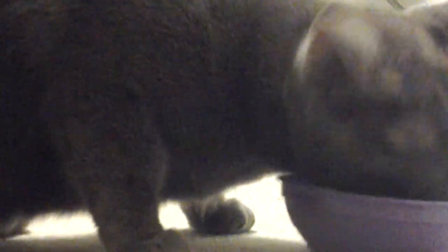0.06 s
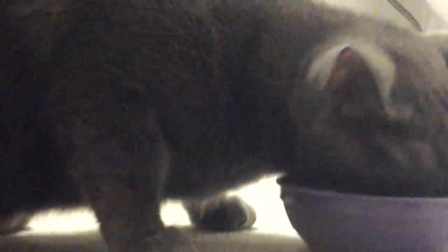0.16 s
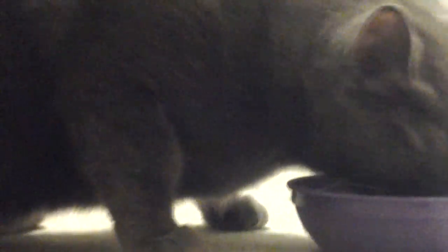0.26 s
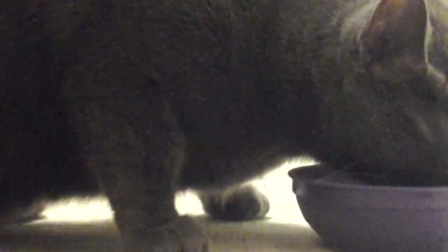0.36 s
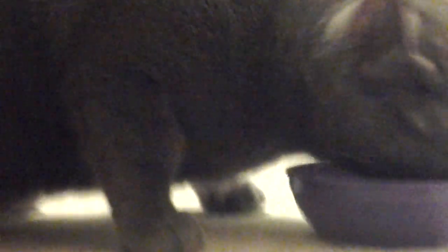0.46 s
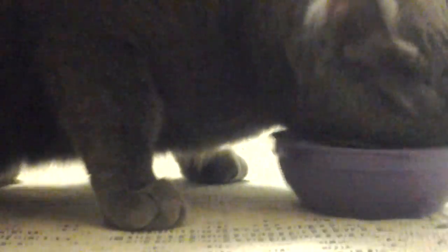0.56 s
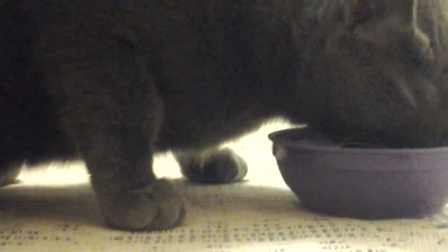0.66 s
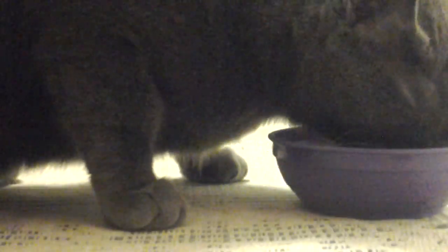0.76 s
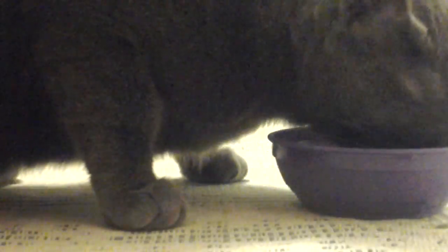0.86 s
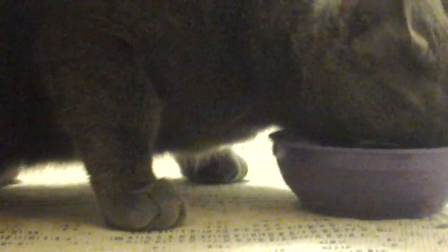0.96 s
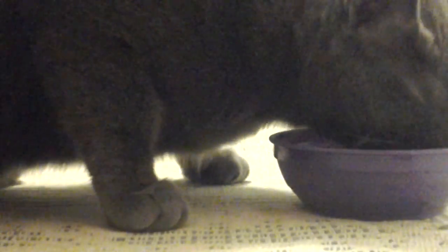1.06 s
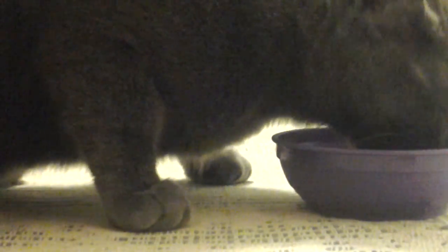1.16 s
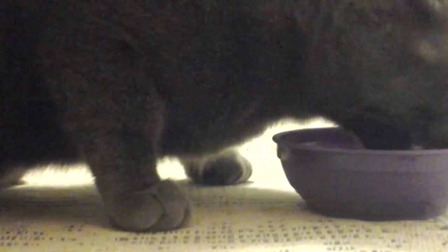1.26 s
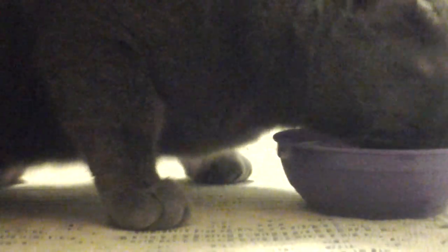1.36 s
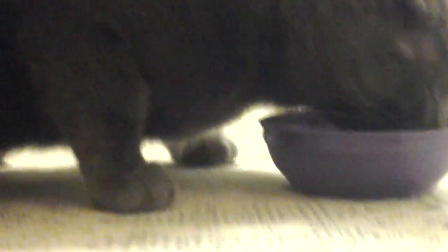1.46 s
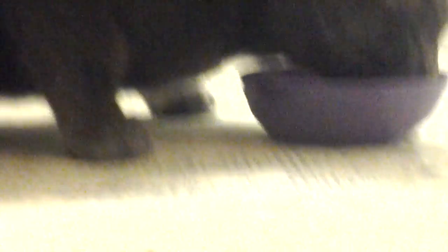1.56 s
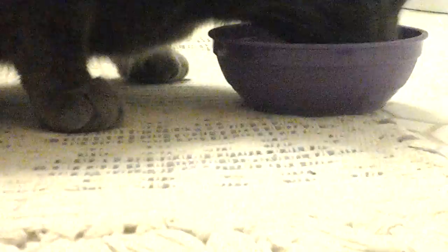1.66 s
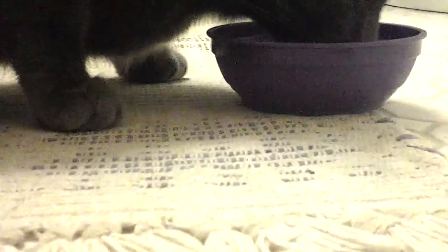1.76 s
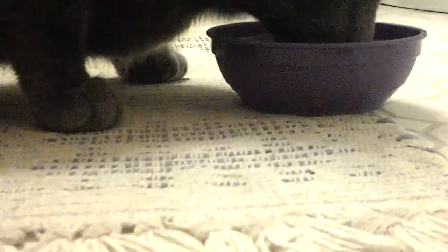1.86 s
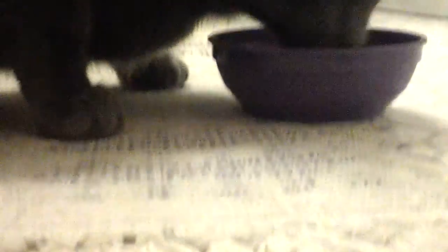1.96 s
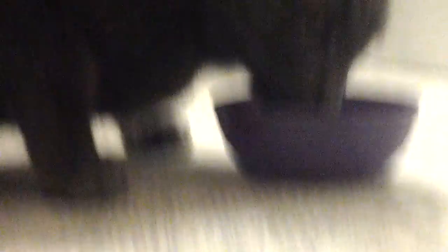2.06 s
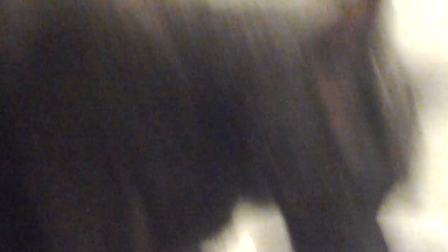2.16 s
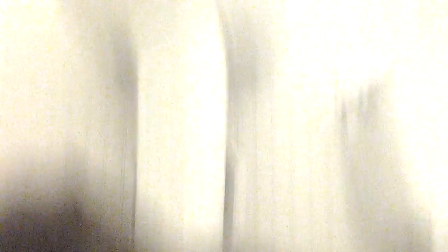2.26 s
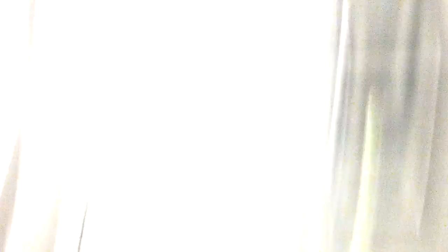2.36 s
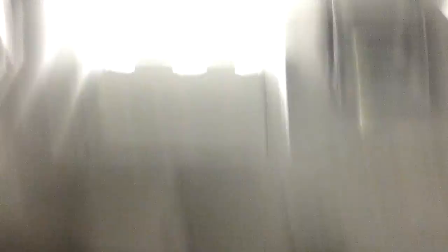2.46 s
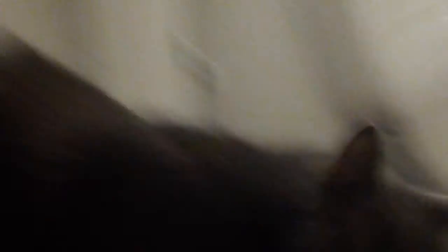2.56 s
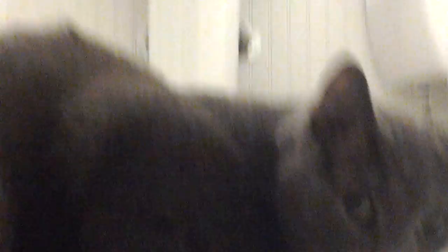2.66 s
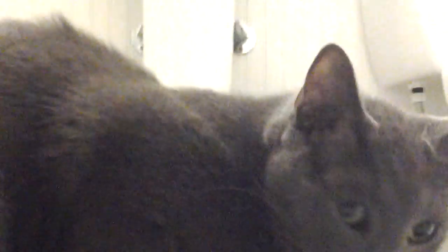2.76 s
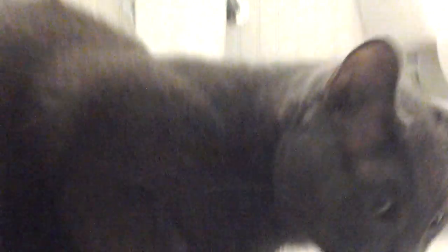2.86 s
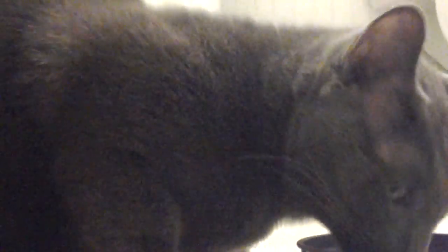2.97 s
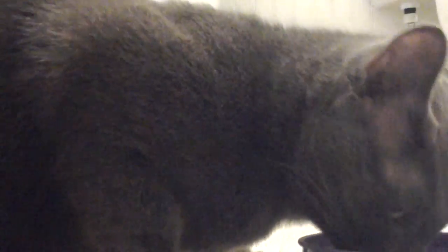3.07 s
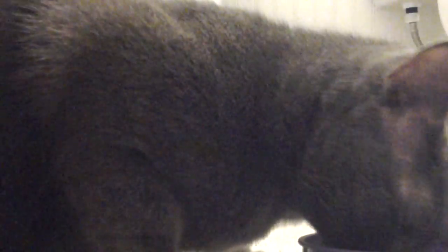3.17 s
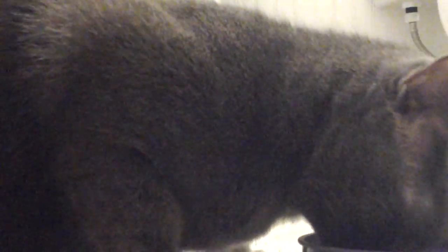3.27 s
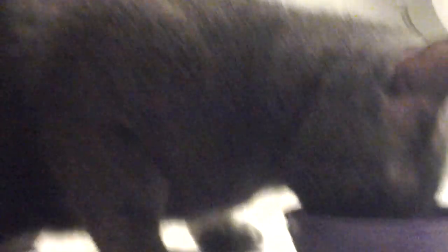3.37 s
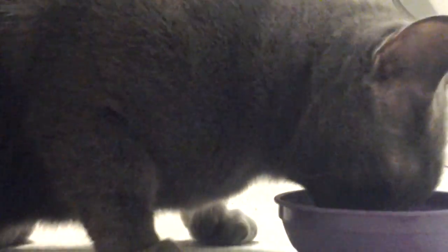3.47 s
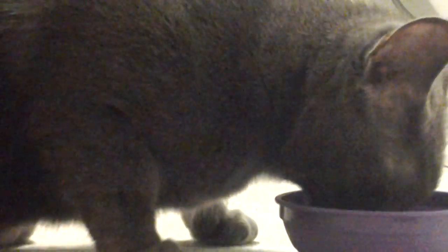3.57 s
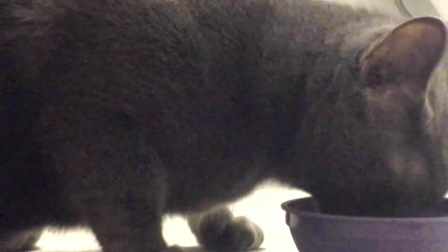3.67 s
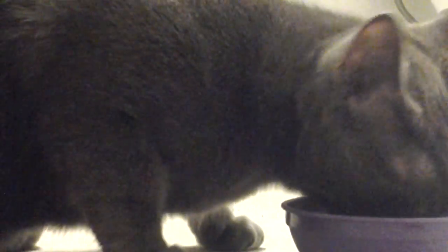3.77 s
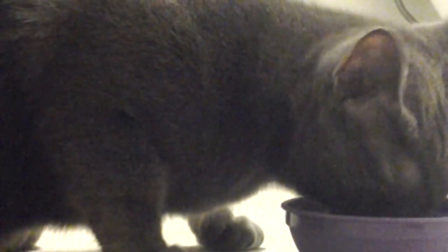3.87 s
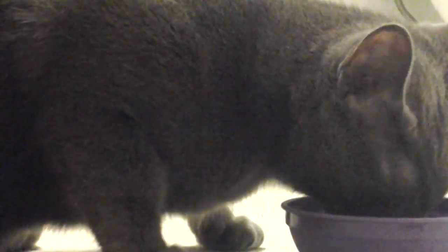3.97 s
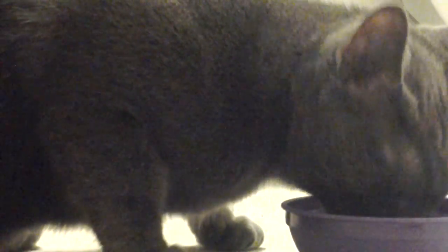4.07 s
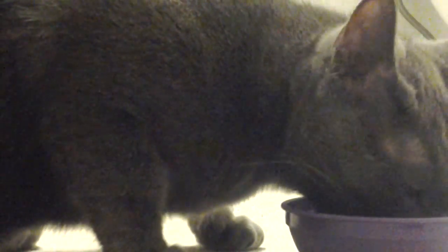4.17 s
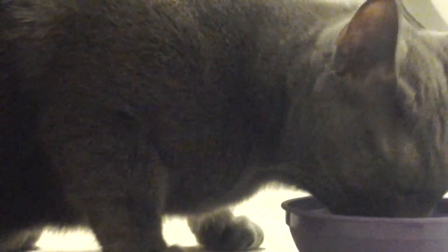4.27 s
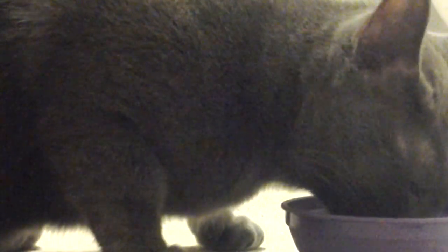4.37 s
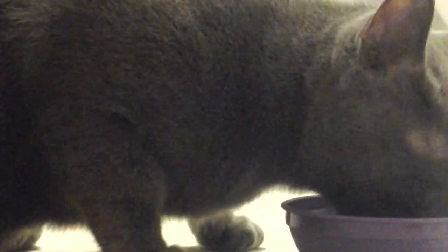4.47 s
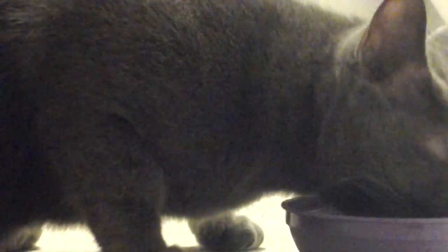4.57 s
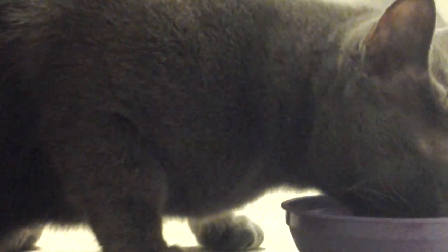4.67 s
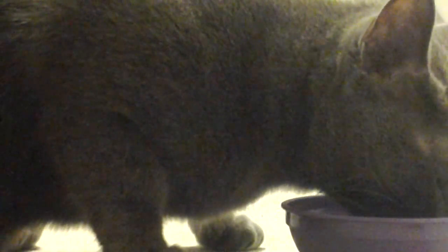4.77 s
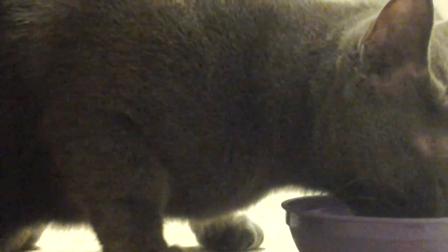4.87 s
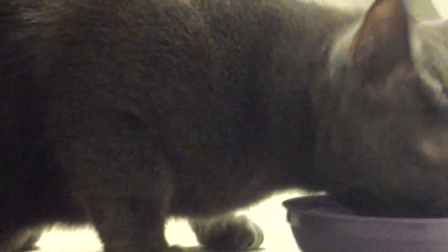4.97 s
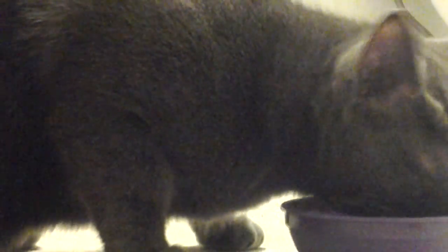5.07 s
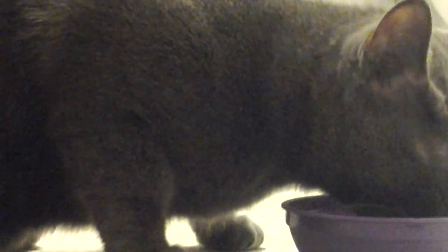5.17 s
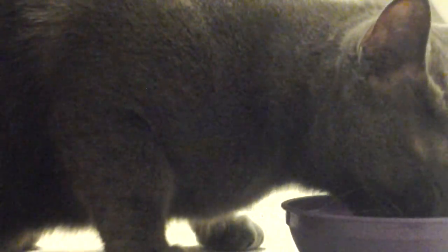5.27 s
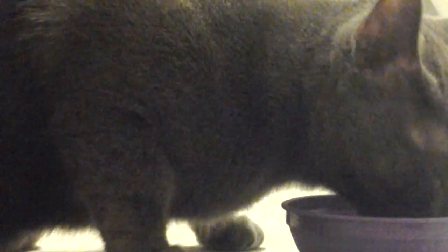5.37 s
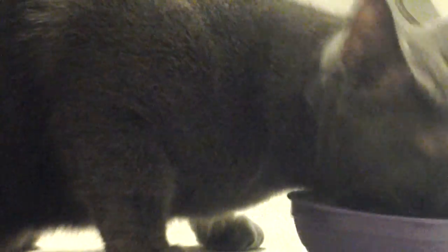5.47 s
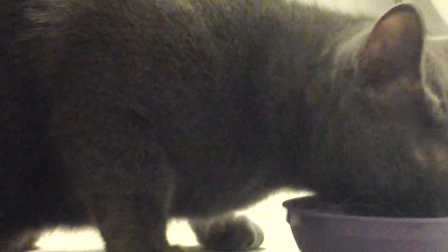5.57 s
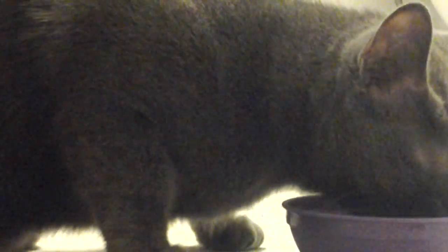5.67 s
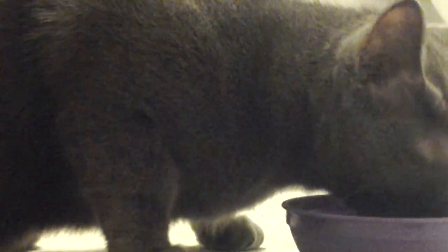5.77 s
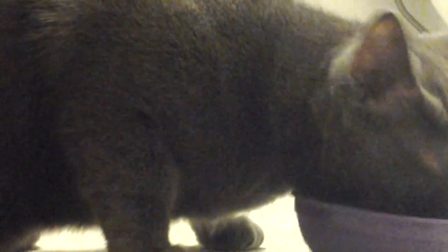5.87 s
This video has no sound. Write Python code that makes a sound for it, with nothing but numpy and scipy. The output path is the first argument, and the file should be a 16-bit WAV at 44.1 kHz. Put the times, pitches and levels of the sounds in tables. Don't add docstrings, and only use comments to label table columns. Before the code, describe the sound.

A cat eats dry food from a plastic bowl, very close to a small hand-held microphone in a small room with faint steady hiss and little bass. From 0 to 0.9 s, irregular kibble snaps and crumbling mix with sharp ticks and dull thuds of fingers on the case, strongest near 0.3 s. From 1 to 1.6 s rubbing, taps and heavier thumps dominate, the hardest at 1.2 s. Faint crunches return around 1.9 s. From 2.3 to 2.7 s the camera swings and strikes the floor: rattling clicks and loud, hollow, clipped bangs, worst around 2.5 s. A quieter gap follows, then a bright latch clack at 3.0 s and light handling. From 3.6 s deeper mouthfuls crack and ring the bowl, densest until 4.5 s, with loose kibble pinging. A soft nose puff swells around 5.2 s; sparse crunches and small bumps continue to the end, near 6 s.

```python
import sys
import numpy as np
from scipy import signal
from scipy.io import wavfile
from scipy.ndimage import uniform_filter1d

SR = 44100
rng = np.random.default_rng(int(sys.argv[2]) if len(sys.argv) > 2 else 0)


def boost(x):
    u = np.asarray(x, float) / 20
    return 10 ** u


def log_audio(samples):
    frames = np.atleast_2d(samples).T
    limited = np.clip(frames, -1, 1)
    pcm = np.round(limited * 32767).astype(np.int16)
    wavfile.write(sys.argv[1], SR, pcm)


N = 260631


def evened(x):
    return x / np.sqrt(np.mean(x ** 2) + 1e-20)


def peaked(x):
    return x / (np.abs(x).max() + 1e-12)


def add(mix, start_s, sound):
    part = mix[max(round(start_s * SR), 0):][:len(sound)]
    part += sound[:len(part)]


def read(points, hz):
    point_hz, value = np.transpose(points)
    return np.interp(np.log(hz + 1), np.log(point_hz + 1), value)


def colour(x, points):
    hz = np.abs(np.fft.fftfreq(4096, 1 / SR))
    octaves_below = np.maximum(np.log2(points[0][0] / (hz + 1)), 0)
    octaves_above = np.maximum(np.log2((hz + 1) / points[-1][0]), 0)
    gain_db = read(points, hz) - 30 * (octaves_below + octaves_above)
    log_gain = np.log(boost(np.maximum(gain_db, -90)))
    taps = np.fft.ifft(np.exp(np.conj(signal.hilbert(log_gain)))).real[:2048]
    return evened(signal.oaconvolve(x, taps)[:len(x)])


def resonate(x, hz, width_hz):
    turn = np.exp(2j * np.pi * hz * np.arange(len(x)) / SR)
    r = np.exp(-np.pi * width_hz / SR)
    return 2 * (turn * signal.lfilter([1 - r], [1, -r], x / turn)).real


def steep(x, hz, width_hz):
    for _ in range(3):
        x = resonate(x, hz, width_hz)
    return peaked(x)


def grains(per_s, spread_db, length_s, bed):
    size = boost(spread_db * np.minimum(rng.exponential(1, N), 3))
    size = size * (rng.random(N) < per_s / SR)
    puff = np.exp(-np.arange(1500) / (length_s * SR))
    gate = bed + evened(signal.oaconvolve(size, puff)[:N])
    return rng.standard_normal(N) * gate


def thuds(rows, sag, roughness):
    out, t = np.zeros(N), np.arange(3000) / SR
    noise = rng.standard_normal((len(rows), len(t)))
    for (start_s, db, hz, t60_s), n in zip(rows, noise):
        turns = hz * (sag * t + (1 - sag) * 0.005 * (1 - np.exp(-t / 0.0029)))
        rattle = evened(steep(n, 1.2 * hz, 1.3 * hz))
        push = np.sin(2 * np.pi * turns) + 0.17 * np.sin(np.pi * turns) + roughness * rattle
        knock = push * boost(-60 * t / t60_s) * (1 - np.exp(-t / 0.0003))
        add(out, start_s, boost(db) * peaked(knock))
    return out


# (frequency [Hz], width [Hz], level [dB])
SHELL_MODES = [(1720, 502, 8.5), (2340, 760, 8)]


def breaks(rows, burst_s, spread):
    out, t = np.zeros(N), np.arange(600) / SR
    noise = rng.standard_normal((len(rows), len(t)))
    for (start_s, crack_db, crack_hz, shell_db, *port_db), n in zip(rows, noise):
        snap = n + 1.5 * np.sign(n) * (t < .0002)
        burst = snap * np.minimum(t / .0001, 1) * np.exp(-t / burst_s)
        crack = steep(burst, crack_hz, spread * crack_hz)
        shell = peaked(sum(boost(db) * steep(burst, hz, 2 * width) for hz, width, db in SHELL_MODES))
        port = sum(boost(db) * steep(burst, 12920, 8600) for db in port_db)
        add(out, start_s, boost(crack_db) * crack + boost(shell_db) * shell + port)
    return out


def pitched(rows, even_hz):
    hz_per_db = 31.5
    return [(start_s, crack_db, even_hz + hz_per_db * np.clip(crack_db - ring_db, -25, 25), ring_db)
            for start_s, crack_db, ring_db in rows]


# (frequency [Hz], density [dB per Hz])
HISS = [(15, -35), (25, -11.5), (49, -10), (247, -1.5), (913, -6), (1440, -7.5), (2720, -12), (4060, -14),
        (6740, -19.5), (14600, -17)]


def hiss(signal_in):
    busy_db = 10 * np.log10(abs(uniform_filter1d(signal_in ** 2, 5000)) + 1e-12)
    sink_db = np.clip(0.39 * (busy_db + 51), -3, 0)
    return boost(-55 + sink_db) * colour(rng.standard_normal(N), HISS)


# (frequency [Hz], t60 [s])
ROOM = [(1300, 0.17), (9000, 0.15)]


def room(x):
    taps = np.zeros(SR // 2)
    at = np.arange(120, SR // 2 - 20, 20)
    taps[at + rng.integers(0, 20, len(at))] = rng.choice([-1., 1.], len(at))
    hz, t, z = signal.stft(taps, SR, nperseg=256)
    decay = boost(-60 * t / read(ROOM, hz)[:, None])
    tail = signal.istft(z * decay, SR, nperseg=256)[1]
    return signal.oaconvolve(x, tail / np.linalg.norm(tail))[:N]


# (start [s], end [s], frequency [Hz], width [Hz], rms level [dB])
HUM = [(1.53, 1.67, 450, 170, -44), (2.15, 2.32, 410, 220, -48), (2.66, 2.76, 420, 110, -40),
       (2.74, 2.85, 400, 100, -47), (2.492, 2.537, 450, 160, -21), (2.565, 2.65, 400, 170, -29),
       (3.07, 3.14, 280, 150, -52), (4.68, 4.94, 540, 110, -62), (5.57, 5.83, 595, 140, -56),
       (3.5, 3.58, 1380, 200, -57), (3.04, 3.4, 2350, 200, -64), (4.012, 4.042, 480, 200, -47)]


def hum():
    out, noise = np.zeros(N), rng.standard_normal((len(HUM), SR // 2))
    for (start_s, end_s, hz, width_hz, db), n in zip(HUM, noise):
        settled = steep(n, hz, width_hz)[4000:]
        tone = evened(settled[:round((end_s - start_s) * SR)])
        add(out, start_s, boost(db) * tone * signal.windows.tukey(len(tone), .25))
    return out


# (firmest contact [s], rubbing level [dB], skin fizz level [dB], reach before [s], reach after [s])
STROKES = [(0.171, -50, -57, 0.21, 0.16), (.44, -45.5, -50, 0.46, 0.49), (.55, -40, -47, .13, 0.13),
           (0.987, -32, -65, 0.019, .04), (1.034, -36, -54, 0.12, 0.15), (1.13, -30, -50, 0.09, 0.21),
           (1.207, -23, -44.5, 0.069, 0.081), (1.245, -30.5, -45.5, 0.054, 0.087),
           (1.49, -39.5, -46.5, 0.19, .18), (1.598, -38.5, -40.5, 0.28, 0.18), (1.78, -48, -63, .06, 0.043),
           (2.07, -50, -63, 0.1, 0.069), (2.18, -47, -46, 0.3, 0.18), (2.29, -38.5, -38, 0.22, 0.46),
           (2.41, -31.5, -37, 0.021, 0.15), (2.5, -18, -41.5, 0.019, .05), (2.53, -30, -45.5, 0.036, .05),
           (2.62, -28.5, -32, .2, 0.037), (2.69, -28.5, -42.5, 0.047, 0.2),
           (3.158, -51.5, -56.5, 0.27, 0.31), (3.43, -47.5, -45, 0.14, 0.11),
           (4.201, -62, -53.5, .92, 0.85), (5.829, -44, -69, 0.049, 0.19), (5.2, -56.5, -74.5, 0.49, 0.62)]


def action(level_column):
    rise_db, fall_db = 29.5, 24
    rows, t = np.transpose(STROKES), np.arange(0, N + 64, 64) / SR
    away_s = t[:, None] - rows[0]
    slope_db = np.where(away_s < 0, rise_db * away_s / rows[3], -fall_db * away_s / rows[4])
    level_db = (rows[level_column] + slope_db).max(axis=1)
    return boost(np.interp(np.arange(N) / SR, t, level_db))


# (frequency [Hz], density [dB per Hz])
CASE = [(29, -89), (50, -7), (300, 0.5), (462, 3), (530, 3.5), (900, 2), (2000, -14.5), (2600, -56),
        (4400, -120)]
# (frequency [Hz], density [dB per Hz])
FIZZ = [(3530, -3.5), (6000, -8), (7570, -6), (12000, -12.5), (14500, -8.5)]


def handling():
    slips = grains(130, 2.7, 0.0039, 2.5)
    rub = evened(colour(slips, CASE) + .6 * evened(steep(slips, 360, 400)))
    fizz = colour(grains(460, 1.5, .001, 1.4), FIZZ)
    return action(1) * rub + boost(-8.0) * action(2) * fizz


# (time [s], peak level [dB], pitch [Hz], t60 [s])
GRIP_THUDS = [(0.3016, -29, 659, 0.1), (0.3133, -16, 446, 0.016), (0.35, -24.5, 387, 0.015),
              (0.3925, -13, 642, 0.018), (0.5276, -23.5, 356, 0.033), (0.543, -21.5, 445, 0.023),
              (0.98, -22, 480, 0.0023), (0.9842, -21.5, 397, 0.021), (1.11, -24.5, 494, 0.026),
              (1.126, -16.5, 510, 0.012), (1.1741, -21, 450, 0.053), (1.201, -3, 360, 0.012),
              (1.2126, -10, 450, 0.0084), (1.2205, -21, 600, 0.066), (1.243, -15, 463, 0.012),
              (1.4719, -16.5, 440, 0.0055), (1.4875, -17, 544, 0.0066), (1.5155, -23.5, 510, 0.055),
              (1.6006, -26, 445, 0.019), (2.064, -34, 692, 0.012), (3.136, -29.5, 335, 0.042),
              (3.143, -29.5, 246, 0.045), (3.242, -34.5, 893, 0.06), (3.4053, -33.5, 283, 0.032),
              (3.4195, -25.5, 332, 0.045), (3.4312, -31, 289, 0.11), (5.585, -35, 664, 0.025),
              (5.817, -30.5, 640, 0.032), (5.8304, -31, 666, 0.021)]
# (time [s], peak level [dB], pitch [Hz], t60 [s])
FLOOR_BUMPS = [(2.2717, -22.5, 390, 0.016), (2.288, -22, 450, 0.04), (2.3751, -14, 407, 0.027),
               (2.3755, -26, 1110, 0.024), (2.2655, -26, 1850, 0.018), (2.3265, -30, 1120, .015),
               (2.4385, -9.5, 330, 0.02), (2.4487, -11, 410, 0.028), (2.4955, -21, 621, .04),
               (2.5047, 5, 460, 0.015), (2.5143, -16, 559, 0.016), (2.5375, 5.5, 1150, 0.024),
               (2.5402, -2.5, 628, 0.011), (2.5492, -11, 990, 0.0044), (2.5372, 2, 2435, 0.021),
               (2.5045, -2.5, 3000, 0.0067), (2.6522, -4.5, 3900, 0.0024), (2.6078, -14.5, 450, 0.039),
               (2.627, -24.5, 382.4, 0.016), (2.6526, 3, 1850, 0.0066), (2.6535, 4, 760, 0.015),
               (2.6697, -8.5, 575, 0.035), (2.997, -38, 914, 0.075), (3.0045, -15, 940, 0.034),
               (3.0055, -21, 458.4, 0.016)]


def knocks():
    return thuds(GRIP_THUDS, .71, 0.46) + thuds(FLOOR_BUMPS, .71, .22)


# (time [s], crack level [dB], crack pitch [Hz], shell level [dB], port level [dB])
TICKS = [(.1135, -27, 7500, -50, -34), (.152, -29, 8000, -43, -24), (.2525, -51, 6500, -46, -34),
         (0.284, -5.5, 6630, -17, -4.5), (.302, -6.5, 5160, -16, 2), (.3116, -28.5, 4210, -16.5, -22),
         (0.3161, -24, 4000, -18, -25), (.4582, -24.5, 5000, -45, -25.5), (2.2663, -14.5, 6240, -17.5, -16),
         (2.2738, -21, 3610, -39, -19), (2.294, -21.5, 4974, -15, -3.5), (2.298, -9, 5340, -52, -8),
         (2.3266, -12.5, 4103, -26, -21.5), (2.4057, -23.5, 5610, -37, -38.5),
         (2.4366, -4, 5210, -15.5, 0.5), (2.4406, 2.5, 5934, -39.5, -2.5), (2.4471, -2.5, 4300, -33.5, -13),
         (2.4549, -7.5, 4970, -29.5, -5.5), (2.4447, -15, 4500, -31, -33),
         (2.2848, -30.5, 7030, -32, -27.5), (2.3197, -29, 5980, -40, -25),
         (2.2642, -28.5, 7000, -24.5, -25), (2.5043, -1.5, 3228, 3.5, -0.5),
         (2.5357, -1.5, 4005, -9.5, -24), (2.5385, 4, 3630, -14, -20.5), (2.5428, -9, 4500, -14.5, -28.5),
         (2.549, -16, 4333, -11.5, -31), (2.6082, -17.5, 4144, -26, -37), (2.652, 7, 5573, -3, -23),
         (2.671, -20, 4050, -6.5, -19), (2.8125, -29, 5530, -37, -19.5), (3.0045, -10.5, 8200, -42, -10.5)]
# (time [s], crack level [dB], shell level [dB])
TAPS = [(.9783, -50, -29), (1.111, -55, -37), (1.126, -33, -21.5), (1.201, -48, -32), (1.2158, -44, -25),
        (1.2433, -40, -23), (1.2779, -34, -39), (1.3555, -58, -29.5), (1.373, -55, -29),
        (1.4254, -28.5, -28), (1.4399, -23, -27), (1.4532, -24, -28), (1.4664, -27, -30), (1.486, -30, -26),
        (1.5151, -27.5, -27), (1.6269, -32, -32), (2.3444, -38, -25), (2.3693, -20, -39),
        (2.376, -26, -19.5), (2.4995, -40, -20), (2.5562, -24.5, -61), (3.2085, -40, -36),
        (3.4204, -33, -38)]


def ticking():
    return breaks(TICKS + pitched(TAPS, 3900), 0.00096, 0.8)


# (time [s], peak level [dB], first pitch [Hz], last pitch [Hz], time to -60 dB [s])
SLAMS = [
    (2.5427, 4, 620, 120, .0105),
    (2.5498, 6, 800, 140, .011),
    (2.5562, -9, 480, 150, .010),
]


def slams():
    out, t = np.zeros(N), np.arange(2000) / SR
    drop_s = .0025
    for start_s, db, first_hz, last_hz, t60_s in SLAMS:
        turns = last_hz * t + (first_hz - last_hz) * drop_s * (1 - np.exp(-t / drop_s))
        add(out, start_s, boost(db - 60 * (t / t60_s) ** 2) * np.sin(2 * np.pi * turns))
    return out


# (time [s], peak level [dB])
CLACKS = [
    (3.0032, -0.5),
    (3.0056, -6),
]
# (frequency [Hz], level [dB])
LATCH = [(2050, -16), (4470, -7), (5300, -5), (6400, -7.5), (7300, -10.5), (8560, -16.5), (11100, -17.5),
         (13700, -13)]
# (frequency [Hz], level [dB], t60 [s])
AFTER = [(787, 7, 0.26), (1263, -4, 0.45), (2030, 4, 0.41), (2900, 5, 0.17), (3400, -16.5, 0.36),
         (4500, 0, 0.49), (5555, -9, 0.2047), (7500, -15, .2), (9000, -18, .2)]


def latch():
    out, t = np.zeros(N), np.arange(8000) / SR
    mode_hz, mode_db = np.transpose(LATCH)[:, :, None]
    t60_s, after_db, after_width_hz = 0.0077, -51, 330
    envelope = boost(-60 * t / t60_s) * np.minimum(t / 0.00053, 1)
    for start_s, peak_db in CLACKS:
        modes = boost(mode_db) * np.sin(2 * np.pi * (mode_hz * t + rng.random(mode_hz.shape)))
        add(out, start_s, boost(peak_db) * peaked(modes.sum(0) * envelope))
    after = np.zeros(len(t))
    for hz, db, ring_t60_s in AFTER:
        fuzz = evened(steep(rng.standard_normal(len(t)), hz, after_width_hz))
        after += boost(db - 60 * t / ring_t60_s) * fuzz
    add(out, CLACKS[-1][0], boost(after_db) * after)
    return out


# (frequency [Hz], density [dB per Hz])
SNUFFLE = [(1700, -12), (2300, -0.5), (3300, -3.5), (5300, 0.5), (7000, -8), (9500, -18)]


def snuffle():
    start_s, length_s, rms_db = 4.88, 0.69, -54.5
    out = np.zeros(N)
    air = colour(rng.standard_normal(SR), SNUFFLE)[:round(length_s * SR)]
    add(out, start_s, boost(rms_db) * air * signal.windows.tukey(len(air), .8))
    return out


# (time [s], peak level [dB], pitch [Hz], t60 [s])
PINGS = [(.0955, -46, 2200, .01), (.2605, -44, 3400, 0.0071), (.8188, -30.5, 1580, 0.035),
         (.8892, -35, 1800, 0.012), (1.0114, -34, 1090, .015), (1.2948, -29, 1290, 0.019),
         (1.4395, -32, 2650, 0.0032), (1.4535, -33, 2730, .004), (1.5856, -33, 1460, .015),
         (1.6255, -23, 1520, 0.017), (1.7343, -40, 1280, 0.01), (1.7752, -43, 1420, 0.022),
         (1.9488, -37, 1110, 0.0084), (1.9985, -38, 1300, 0.011), (2.0606, -33.5, 1110, 0.017),
         (2.1745, -38, 1000, 0.014), (2.195, -38, 860, 0.016), (2.5816, -31, 2460, 0.009),
         (2.9174, -41.5, 2040, 0.0044), (3.17, -42, 750, 0.014), (3.1867, -47, 1520, 0.0055),
         (3.2077, -35, 1076, 0.0041), (3.2195, -52, 1497, .006), (3.3589, -41, 4500, 0.0071),
         (3.629, -40.5, 1600, .01), (3.797, -28.5, 1490, .012), (4.196, -33, 1700, 0.013),
         (4.2545, -39, 1470, .03), (4.329, -38, 1500, .02), (4.4335, -38, 1740, 0.027),
         (4.4505, -31, 1826, 0.018), (4.479, -31.5, 1565, .03), (4.735, -37, 2620, 0.0084),
         (4.9728, -45.5, 1498, 0.03), (5.0227, -39, 2100, 0.011), (5.0381, -30, 2010, 0.029),
         (5.042, -24, 2340, 0.021), (5.1434, -37.5, 2500, 0.014), (5.165, -37, 4400, 0.0048),
         (5.2475, -50.5, 1515, 0.0083), (5.2765, -45, 1324, .01), (5.5066, -40.5, 4640, 0.011),
         (5.5289, -35, 1560, 0.026), (5.546, -38, 2230, .008), (5.7021, -40, 1680, .015),
         (5.8185, -25.5, 1180, .016), (5.829, -28, 1500, 0.019), (5.8807, -42, 4030, 0.0102),
         (5.8887, -23.5, 4530, 0.0023)]


def rolling():
    return thuds(PINGS, 0.97, 0.39)


# (time [s], hollow level [dB], brittle level [dB], t60 [s])
BITES = [(0, -50, -52, 0.26), (.06, -47.5, -58, 0.79), (.105, -40, -45, 0.48), (.145, -38.5, -41, 1),
         (.191, -39, -40.5, 0.77), (0.332, -34, -39, 0.34), (0.52, -42, -47, 0.81),
         (.566, -41.5, -44.5, 0.56), (0.644, -42, -50, 0.29), (.761, -46.5, -58, 1), (.818, -50, -54, 0.79),
         (3.52, -54.5, -98, 0.46), (3.669, -47.5, -53.5, 0.81), (3.727, -38.5, -43, 1),
         (3.872, -41.5, -52, 1), (3.954, -37, -32.5, 0.32), (4.04, -38, -43, 0.72), (4.165, -45, -51, .16),
         (4.251, -38, -48.5, 0.52), (4.326, -55, -63, 0.82), (4.432, -41.5, -54, 0.85),
         (4.607, -40, -47.5, 0.44), (4.841, -57, -62, 0.22), (4.962, -65, -63, 0.49),
         (5.039, -39.5, -46, 0.39), (5.14, -47.5, -56, 0.4), (5.447, -55, -57.5, 0.63),
         (5.593, -46, -47.5, 0.47), (5.699, -47.5, -54.5, 0.33), (5.817, -50, -51.5, 0.59),
         (5.877, -45, -43.5, 0.77)]
# (time [s], hollow level [dB], brittle level [dB], t60 [s])
SCUFFS = [(0.95, -38.5, -67, 0.17), (1.011, -50, -67, 0.97), (1.13, -42, -60, .98),
          (1.199, -33.5, -51.5, 0.48), (1.35, -48.5, -79, 0.88), (1.43, -53.5, -55, 0.93),
          (1.601, -52, -51, 0.61), (1.95, -75, -53, 0.18), (1.986, -72, -47, 0.14), (2.051, -54, -64, .98),
          (2.17, -57.5, -54.5, 0.96), (2.262, -43, -41, 0.3), (2.326, -35, -28, 0.065),
          (2.409, -41, -41, 0.52), (2.501, -27, -25, 0.1), (2.582, -35.5, -39, 0.34),
          (2.658, -29.5, -29.5, 0.42), (3.018, -53, -49.5, 0.52), (3.189, -59, -55, 0.2)]
# (frequency [Hz], density [dB per Hz])
CRUMB_LOW = [(410, -46), (700, -28.5), (1230, -0.5), (1540, 2), (2020, -2), (3600, -12), (4680, -39.5),
             (7920, -120)]
# (frequency [Hz], density [dB per Hz])
CRUMB_HIGH = [(1410, -42), (2400, 1), (3920, 3.5), (5410, 1.5), (10000, -29), (13000, -62), (22000, -120)]


def crumbling():
    start_s, low_db, high_db, t60_s = np.transpose(BITES + SCUFFS)
    t = np.arange(0, N + 64, 64) / SR
    age_s = t[:, None] - start_s
    fade_db = np.where(age_s < 0, 3000 * age_s, -60 * age_s / t60_s)
    low_level_db, high_level_db = (fade_db + low_db).max(axis=1), (fade_db + high_db).max(axis=1)
    low = boost(np.interp(np.arange(N) / SR, t, low_level_db))
    high = boost(np.interp(np.arange(N) / SR, t, high_level_db))
    fractures = grains(450, 2.2, 0.0005, 1.3)
    return low * colour(fractures, CRUMB_LOW) + high * colour(fractures, CRUMB_HIGH)


# (time [s], crack level [dB], bowl ring level [dB])
SNAPS = [(.0632, -41, -41), (.1078, -24, -51), (.1121, -21, -36), (.1478, -24, -33), (.1819, -20, -50),
         (.1969, -23, -25), (.2596, -40, -47), (.3923, -20, -54), (.5336, -21.5, -48), (.5514, -39, -26),
         (.5657, -17, -13.5), (.6511, -32, -33), (.6575, -23.5, -40), (.7582, -39, -38), (.8195, -56, -29),
         (.9498, -37, -39), (1.8832, -33, -44), (1.9488, -30.5, -38), (1.9847, -20.5, -32.5),
         (2.0612, -33.5, -35), (2.1731, -37, -38), (3.6106, -48, -31.5), (3.7063, -26, -32.5)]
# (time [s], crack level [dB], bowl ring level [dB])
LATE_SNAPS = [(3.7473, -34, -21), (3.7582, -23.5, -14), (3.8297, -38, -23), (3.8643, -44, -22.5),
              (3.877, -23, -23), (3.9372, -27, -26), (3.9538, -11.5, -57), (3.9691, -18.5, -50),
              (4.047, -14, -31.5), (4.0573, -25, -30), (4.1162, -26, -33), (4.1682, -38, -22),
              (4.2528, -19.5, -14), (4.2687, -51.5, -25), (4.3277, -28.5, -19.5), (4.4267, -26.5, -23),
              (4.4332, -47.5, -19), (4.4499, -16.5, -16), (4.6388, -31, -23.5), (4.7002, -40, -30),
              (5.0382, -27, -39), (5.0422, -35, -25.5), (5.0648, -28, -33), (5.0761, -37.5, -25),
              (5.457, -35, -35.5), (5.5914, -26.5, -22), (5.6393, -32, -43), (5.8222, -35, -40),
              (5.8985, -37, -36)]


def snapping():
    return breaks(pitched(SNAPS, 3610) + pitched(LATE_SNAPS, 3170), 0.0008, .55)


def scene():
    bowl = snapping() + rolling()
    ticks = ticking()
    echo = room(boost(-5.5) * bowl + boost(-39.5) * ticks)
    camera = hum() + handling() + knocks() + ticks + slams() + latch()
    mono = echo + camera + snuffle() + crumbling() + bowl
    return np.array([mono, mono])


def starved(x):
    hz, _, z = signal.stft(x, SR, nperseg=1024)
    power = abs(z) ** 2 + 1e-20
    mids = power[:, (hz > 800) & (hz < 5000)].mean(axis=1, keepdims=True)
    mids = uniform_filter1d(mids, 3, axis=2)
    limit = .72 * np.median(power, axis=2, keepdims=True) * (mids / np.median(mids)) ** .44
    smooth = uniform_filter1d(uniform_filter1d(power, 3, axis=2), 3, axis=1)
    treble = power[:, hz > 6500].mean(axis=1, keepdims=True)
    calm = treble < 60 * np.median(treble)
    lost = (smooth < limit) & calm & (hz[:, None] > 6500)
    return signal.istft(z * ~lost, SR, nperseg=1024)[1][:, :N]


def low_pass(x):
    return signal.sosfilt(signal.butter(12, 15670, fs=SR, output="sos"), x)


def record(dry):
    thin = signal.sosfilt(signal.butter(3, 145, "high", fs=SR, output="sos"), dry)
    noisy = thin + hiss(thin[0])
    dulled = signal.sosfiltfilt(signal.cheby2(12, 50, 15200, fs=SR, output="sos"), noisy)
    finished = starved(np.clip(dulled, -1, 1))
    return low_pass(finished)


dry = scene()
out = record(dry)
log_audio(out)
```